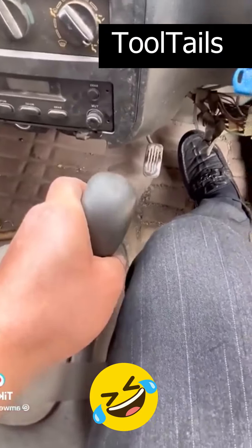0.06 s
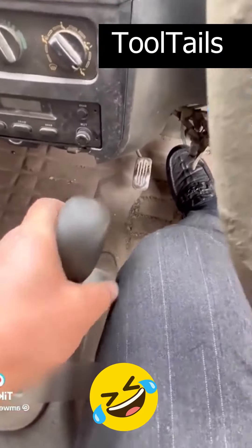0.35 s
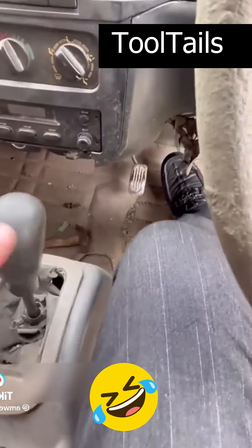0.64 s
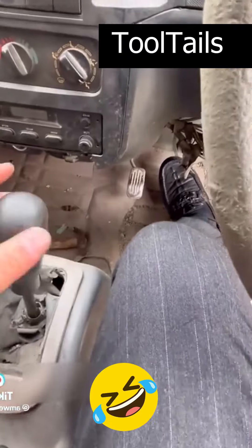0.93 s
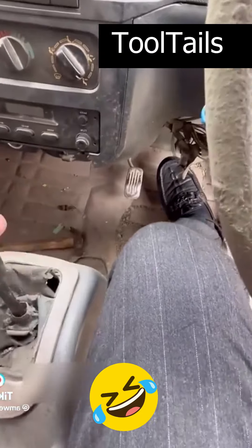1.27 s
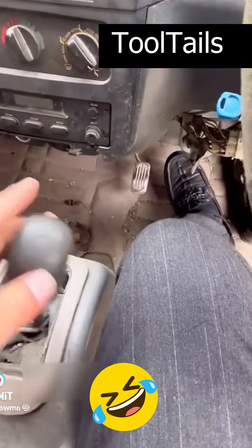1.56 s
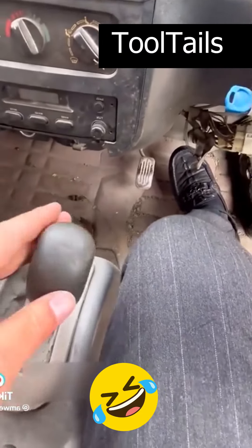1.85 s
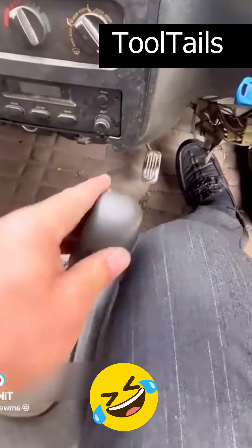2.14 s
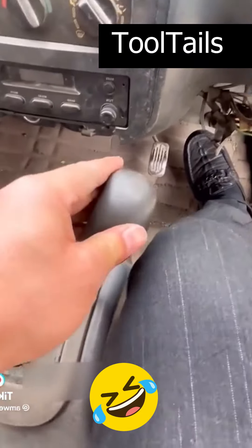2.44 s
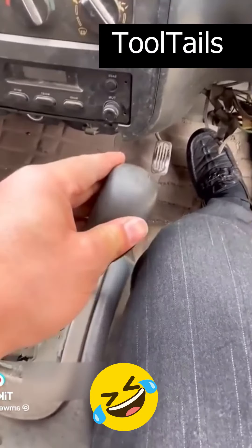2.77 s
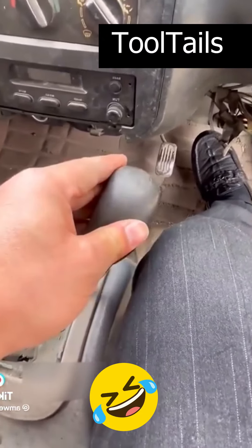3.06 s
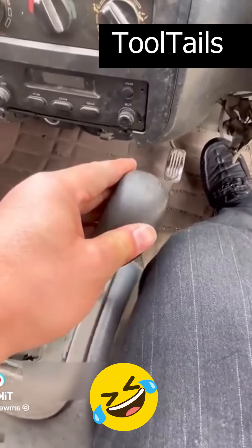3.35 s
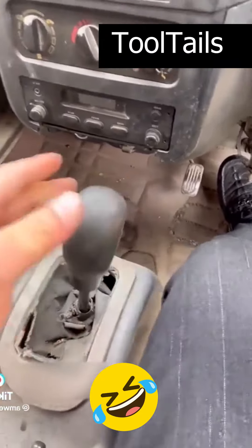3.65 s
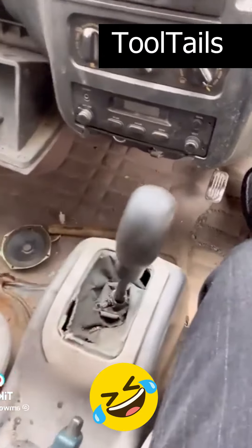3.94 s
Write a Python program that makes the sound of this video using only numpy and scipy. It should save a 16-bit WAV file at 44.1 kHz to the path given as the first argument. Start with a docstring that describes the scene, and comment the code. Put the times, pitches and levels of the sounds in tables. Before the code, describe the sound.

Heard close inside an old car, a gear lever buzzes twice with a wavering metallic grind as a hand leans on it. Soft, loose knocks fill the gap, and the idling engine rumbles and booms throughout.

```python
"""A worn gear lever buzzes twice inside an old car at idle. A hand leans on it and the gear teeth graze:
they stumble, then settle into a loud buzz whose pitch sways about once per engine cycle.
Each tooth strikes and bounces back, ringing the linkage (the rods that join lever and gears).
Between the two buzzes the loose lever knocks softly. Underneath, the engine rumbles and booms."""
import sys
import numpy as np
from scipy import signal
from scipy.fft import rfft, irfft
from scipy.io import wavfile
from scipy.ndimage import uniform_filter1d

SR = 44100
rng = np.random.default_rng(int(sys.argv[2]) if len(sys.argv) > 2 else 0)


def file_out(sig):
    """Save sig as 16-bit WAV at sys.argv[1]."""
    # one column per channel
    cols = np.atleast_2d(sig).T
    # limit, then scale
    lim = np.clip(cols, -1, 1)
    pcm = np.round(lim * 32767).astype(np.int16)
    wavfile.write(sys.argv[1], SR, pcm)


N = 176400
T = np.arange(N) / SR

# how hard the teeth touch, one list per buzz: time_s, drone_db, clatter_db
BUZZES = [
    [(0.0, -22.5, -30), (0.034, -15, -31), (0.08, -30, -32.5), (0.116, -37, -29.5), (0.158, -21, -32.5),
     (0.244, -19, -28.5), (0.398, -20.5, -28), (0.502, -17.5, -27.5), (0.554, -21.5, -28.5),
     (0.602, -27, -38.5), (0.68, -63, -46)],
    [(2.49, -41, -49.5), (2.594, -18.5, -23.5), (2.618, -16.5, -28.5), (2.638, -28, -23.5),
     (2.73, -15, -26.5), (2.768, -13.5, -22.5), (2.826, -14, -24), (2.89, -13.5, -22), (3.09, -13.5, -21.5),
     (3.3, -16.5, -24), (3.636, -16, -24), (3.67, -22, -36.5), (3.7, -43, -49)],
]
# pitch sway of each buzz: highest_at_s, depth_share
SWAYS = [(0.414, .03), (2.955, .034)]
# how hard the linkage rings in each buzz: gain_db
RING_DB = [-1, -3]
# the teeth catch and drag: time_s, half_length_s, speed_lost_share
CATCHES = [(0.036, 0.049, 0.087), (2.607, 0.029, .1), (2.739, .025, .045)]
# tones in the lever's drone: tooth_rate_multiple, gain_db
DRONE_TONES = [(1, -13), (2, 0), (3, -14.5), (4, -17), (5, -15.5), (6, -22), (7, -28.5)]
# notes the linkage rings at: pitch_hz, width_hz, gain_db
LINKAGE_NOTES = [(335, 21, -24), (474, 23, 10), (523, 23, 0.5), (688.7, 15, 6.5), (791, 11.5, 2),
                 (920, 24, -3), (1326, 71, 7), (1597, 34, 1), (1736, 40, 0.5), (1983, 30, -2),
                 (2148, 29, 2), (2285, 17, -6), (2967, 66, -4.5), (3494, 165, -5.5), (4190, 70, -5.5),
                 (4830, 200, -4.5)]
# thin ring of the gear wheel: pitch_hz, width_hz, gain_db
WHEEL_NOTES = [(7900, 31, 5), (8260, 23, 4), (8400, 13, -9), (8350, 22, 8), (8800, 36, -6), (8920, 130, -2)]
# tone colour of a tooth's crack: frequency_hz, gain_db
CRACK_COLOUR = [(100, -5), (200, 12), (330, 2.5), (600, 5), (900, 1.5), (1130, 0), (1500, 3), (2200, 0),
                (2600, -3.5), (3600, -7), (5500, -8.5), (7500, -10), (9000, -14), (10200, -21.5),
                (12500, -15.5), (14000, -30.5)]
# left-right difference of the clatter: frequency_hz, gain_db
CLATTER_STEREO = [(100, -69), (270, -70), (500, -56), (800, -40), (1300, -79), (2200, -72), (3300, -66),
                  (4600, -7.5), (6300, -3), (8200, -10.5), (10000, -32), (13000, -4.5)]
# the lever jumps and thuds: time_s, half_length_s, level_db
JUMPS = [(0.11, 0.05, -19), (2.592, .012, -15), (2.632, 0.013, -15.5), (2.66, 0.0096, -15),
         (2.681, 0.014, -11.5)]
# tone colour of those thuds: frequency_hz, gain_db
JUMP_COLOUR = [(30, -12), (65, 3), (140, 2.5), (220, 1.5), (330, -5), (500, -11.5), (1200, -38),
               (4000, -57), (14000, -63)]
# single teeth hit hard: start_s, level_db
CLACKS = [(0.037, -29.5), (0.105, -32), (0.499, -43), (2.575, -35), (2.606, -29), (2.629, -27),
          (2.659, -26), (2.667, -26), (2.678, -26)]
# freed gears sing faintly: start_s, pitch_hz, rise_hz_per_s, width_hz, level_db, fade_s
WHINES = [(0.53, 2700, 100, 190, -37, .75), (0.5, 3800, 0, 800, -39, 1.0), (0.52, 4550, 0, 550, -39, .9),
          (3.66, 2060, 350, 150, -41, .6), (3.68, 2480, 800, 300, -46, .95)]
# the loose lever knocks: start_s, level_db, pitch_hz, width_hz, fade_s
KNOCKS = [(0.945, -38, 350, 352, .15), (1.155, -27, 270, 160, .09), (1.35, -38, 600, 900, 0.14),
          (1.375, -27, 300, 250, .1), (1.394, -38, 505, 900, 0.11), (1.493, -32, 600, 700, 0.06),
          (1.532, -39, 1300, 1790, 0.088), (1.649, -32, 540, 920, 0.05), (1.651, -47, 4930, 5000, 0.14),
          (1.66, -24, 290, 160, .08), (1.81, -29, 290, 160, .08), (1.936, -37, 900, 1500, 0.041),
          (2.276, -33, 1540, 700, .035), (2.32, -28, 280, 130, .16), (2.484, -32, 600, 700, .05)]
# tones in the engine's hum: cycle_rate_multiple, unloaded_level_db
ENGINE_TONES = [(4, -37.5), (6, -36), (7, -32), (8, -38), (9, -31.5), (10, -35), (11, -37.5), (13, -43.5),
                (20, -38.5)]
# tone colour of the engine's rumble: frequency_hz, gain_db
RUMBLE_COLOUR = [(20, -27), (36, -29), (52, -7), (78, 0), (100, -17.5), (140, 3.5), (190, -35), (300, -53),
                 (1200, -70)]
# heavy lumps of the idle make the car body boom: time_s, pitch_hz, level_db
BOOMS = [(0.03, 60, -21), (0.125, 64, -12.5), (0.27, 80, -23), (0.355, 64, -15), (0.44, 66, -20),
         (0.785, 55.5, -19), (0.925, 56, -20), (1.26, 56, -16.5), (1.385, 62, -22), (1.515, 66.9, -26.5),
         (1.585, 67.4, -17), (1.665, 67, -14.5), (1.742, 57.7, -21), (1.94, 73.6, -19), (2.14, 55.3, -18),
         (2.345, 76, -20), (2.479, 55.7, -19), (2.655, 58, -18), (2.76, 61, -15), (3.81, 58, -20),
         (3.93, 58, -17)]
# tone colour of the engine's moving parts: frequency_hz, gain_db
MACHINE_COLOUR = [(90, -19), (170, -6), (215, -3), (335, -1), (375, -11), (470, -13), (620, -20),
                  (1030, -22), (2000, -30), (3500, -34), (5400, -44.5), (7500, -43), (10000, -54.5),
                  (14000, -58)]
# their loudness: time_s, level_db
MACHINE_LEVEL = [(0.6, -31), (1.25, -36.5), (1.5, -32.5), (2.1, -34.5), (2.35, -32.5), (3.8, -33)]
# their left-right difference: frequency_hz, gain_db
MACHINE_STEREO = [(100, -10), (250, -34.5), (400, -8), (680, 5.5), (1250, -6), (2300, -1), (4200, 4.5),
                  (10000, -0.5)]

TOOTH_HZ, SWAY_HZ, WANDER_SHARE = 134.55, 7.72, .004
ENGINE_CYCLE_HZ, CYCLE_PEAK_S = 7.37, 1.262


def tooth_contact():
    """Grazing teeth set the gains of drone, clatter and ring; their rate sways, drags and wanders."""
    drone, clatter, ring, sway = np.zeros((4, N))
    for rows, (peak_s, depth), ring_db in zip(BUZZES, SWAYS, RING_DB):
        times, drone_db, clatter_db = np.array(rows).T
        touching = (T >= times[0]) & (T <= times[-1])
        drone += touching * undb(np.interp(T, times, drone_db))
        clatter += touching * undb(np.interp(T, times, clatter_db))
        ring += touching * undb(ring_db)
        sway += touching * depth * np.cos(2 * np.pi * SWAY_HZ * (T - peak_s))
    drag = sum(loss * swell(at, half) for at, half, loss in CATCHES)
    tooth_hz = TOOTH_HZ * (1 + sway - drag + WANDER_SHARE * walk(40))
    return uniform_filter1d(drone, size=200), uniform_filter1d(clatter, size=200), ring, tooth_hz


def lever_drone(teeth_passed):
    """The lever shakes at the tooth rate and its multiples; each tone flutters in loudness."""
    phase = 2 * np.pi * teeth_passed + .057 * walk(143)
    return sum(overtone(phase, k, db - .5 + 2 * walk(57)) for k, db in DRONE_TONES)


def tooth_strikes(teeth_passed):
    """Every tooth hits once and bounces back once, each time a little differently."""
    teeth = np.arange(int(teeth_passed[-1]))
    chance = rng.standard_normal((700, 4))[:len(teeth)].T
    hit, bounce = (0, 0, .00009), (.44, -1.5, .00025)
    pulses = np.zeros(N)
    for k, (lag_teeth, db, jitter_s) in enumerate([hit, bounce]):
        at = np.interp(teeth + lag_teeth, teeth_passed, T) + jitter_s * chance[k]
        np.add.at(pulses, (at * SR).astype(int) % N, undb(db + 1.5 * chance[k + 2]))
    return pulses


def tooth_clatter(teeth_passed, ring_gain):
    """Strikes ring the linkage and grind. Left and right differ mostly in the treble."""
    pulses = tooth_strikes(teeth_passed)
    push = signal.lfilter(*signal.butter(2, 3470, fs=SR), pulses)  # softens each hit
    ringing = unit(sum(undb(db) * resonate(push, hz, width) for hz, width, db in LINKAGE_NOTES))
    ringing += linkage_singing()
    middle = ring_gain * ringing + grinding(pulses)
    side = ring_gain * cabin_echoes(ringing) + grinding(pulses)
    return spread(middle, side, CLATTER_STEREO)


def linkage_singing(pitch_hz=1336, wander_hz=20):
    """Constant striking keeps one note of the linkage sounding; its pitch wanders slightly."""
    phase = 2 * np.pi * np.cumsum(pitch_hz + wander_hz * walk(44.5)) / SR
    return np.sqrt(2) * undb(-6.5 + 2 * walk(60)) * np.sin(phase)


def grinding(pulses, crack_s=.0035):
    """Each strike brings a short crack over steady grinding; the wheel's notes come and go."""
    cracks = unit(signal.lfilter([1], [1, -np.exp(-1 / (crack_s * SR))], pulses))
    strength = .93 + cracks
    wheel = unit(sum(undb(db + 3.5 * walk(9)) * resonate(strength * noise(), hz, width)
                     for hz, width, db in WHEEL_NOTES))
    grind = unit(colour(strength * noise(), CRACK_COLOUR))
    return undb(-3) * grind + undb(-20) * wheel


def loose_lever():
    """Thuds and clacks as the lever jumps, whines as the teeth part, soft knocks while it hangs free."""
    jumps = sum(undb(db) * swell(at, half) for at, half, db in JUMPS)
    thuds = unit(colour(noise(), JUMP_COLOUR)) * jumps
    clacks = sum(knock(at, db, hz=4470, width_hz=6600, fade_s=.03) for at, db in CLACKS)
    whines = sum(gear_whine(*row) for row in WHINES)
    knocks = sum(knock(*row) for row in KNOCKS)
    return thuds + clacks + whines + knocks


def knock(start_s, db, hz, width_hz, fade_s):
    """A hit: noisy ringing around one pitch starts at once and falls 60 dB in fade_s."""
    ring = unit(resonate(resonate(noise(), hz, width_hz), hz, width_hz))
    return ring * (T >= start_s) * undb(db - 60 * np.maximum(T - start_s, 0) / fade_s)


def gear_whine(start_s, hz, rise_hz_per_s, width_hz, db, fade_s, attack_s=.019):
    """A freed gear sings a rough tone that swells, may climb, and dies away."""
    age = np.maximum(T - start_s, 0)
    phase = 2 * np.pi * np.cumsum(hz + rise_hz_per_s * np.minimum(age, fade_s)) / SR
    tone = walk(width_hz) * np.cos(phase) + walk(width_hz) * np.sin(phase)
    return tone * np.minimum(age / attack_s, 1) * undb(db - 60 * age / fade_s)


def engine(load, full_load_db=5):
    """A lumpy idle booms and its moving parts throb; hum and rumble grow with the load (0 to 1)."""
    phase = 2 * np.pi * ENGINE_CYCLE_HZ * (T - CYCLE_PEAK_S)
    hum = sum(overtone(phase, k, db + 2.5 * walk(21)) for k, db in ENGINE_TONES)
    rumble = unit(colour(noise(), RUMBLE_COLOUR)) * undb(-32.5 + .5 * np.cos(phase))
    booms = sum(undb(db) * swell(at, half_s=.033) * np.sin(2 * np.pi * (hz * T + rng.random()))
                for at, hz, db in BOOMS)
    machine_db = np.interp(T, *np.array(MACHINE_LEVEL).T)
    throb = undb(machine_db + .85 * np.cos(phase) + 2.15 * walk(37))
    middle, side = (unit(colour(noise(), MACHINE_COLOUR)) for _ in range(2))
    machine = throb * spread(middle, side, MACHINE_STEREO)
    return (hum + rumble) * undb(full_load_db * load) + booms + machine


def cabin_echoes(x, fade_s=.042):
    """Dense, short echoes off dashboard, floor and glass."""
    tail = noise() * undb(-60 * T / fade_s)
    return unit(signal.fftconvolve(x, tail)[:N])


def spread(middle, side, side_colour):
    """Two channels: a coloured side signal widens the sound."""
    return middle + colour(side, side_colour) * np.array([[1], [-1]])


def overtone(phase, multiple, db):
    """A pure tone at a whole multiple of a base rate, starting anywhere in its wave."""
    return np.sqrt(2) * undb(db) * np.sin(round(multiple) * phase + 2 * np.pi * rng.random())


def colour(x, points):
    """Shape bass and treble along (frequency_hz, gain_db) points."""
    hz, db = np.array(points, float).T
    grid_hz = np.fft.rfftfreq(8192, 1 / SR) + 1
    log_gain = np.log(undb(np.interp(np.log(grid_hz), np.log(hz), db)))
    cepstrum = irfft(log_gain)
    cepstrum[1:4096] *= 2  # folded so that the filter never rings before a hit
    cepstrum[4097:] = 0
    return signal.fftconvolve(x, irfft(np.exp(rfft(cepstrum))))[:N]


def resonate(x, hz, width_hz):
    """Ring at one pitch; a narrower width rings longer."""
    return signal.lfilter(*signal.iirpeak(hz, hz / width_hz, fs=SR), x)


def swell(time_s, half_s):
    """A smooth bump in time."""
    return np.exp(-((T - time_s) / half_s) ** 2)


def walk(rate_hz):
    """Smooth random wobble with a typical size of 1."""
    k = int(SR / rate_hz)
    return unit(uniform_filter1d(uniform_filter1d(noise(), k, mode="wrap"), k, mode="wrap"))


def noise():
    """Plain hiss (white noise)."""
    return rng.standard_normal(N)


def unit(x):
    """Scale to an average strength (rms) of 1."""
    return x / np.sqrt(np.mean(x ** 2))


def undb(db):
    """Turn decibels into a gain."""
    return 10 ** (np.asarray(db) / 20)


def scene():
    """The buzzing lever over the idling engine, which is loaded as the teeth clatter."""
    drone_gain, clatter_gain, ring_gain, tooth_hz = tooth_contact()
    teeth_passed = np.cumsum(tooth_hz) / SR
    drone = drone_gain * lever_drone(teeth_passed)
    clatter = clatter_gain * tooth_clatter(teeth_passed, ring_gain)
    return drone + clatter + engine(load=clatter_gain / clatter_gain.max()) + loose_lever()


def record(dry, ceiling=.72, top_hz=14100):
    """Round off the tallest peaks and cut the highest treble."""
    rounded = dry / (1 + (dry / ceiling) ** 6) ** (1 / 6)
    return signal.sosfilt(signal.ellip(8, .2, 80, top_hz, fs=SR, output="sos"), rounded)


dry = scene()
out = record(dry)
file_out(out)
```